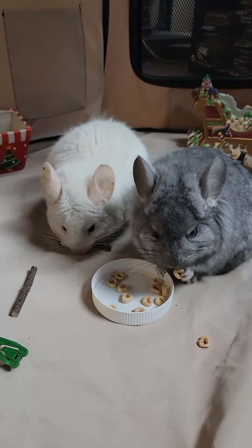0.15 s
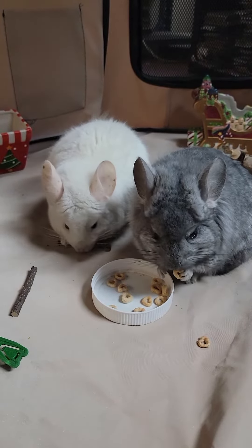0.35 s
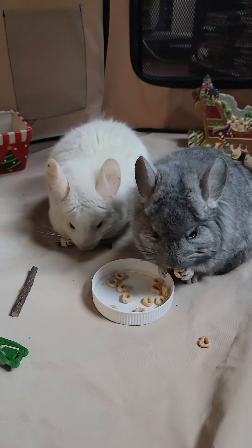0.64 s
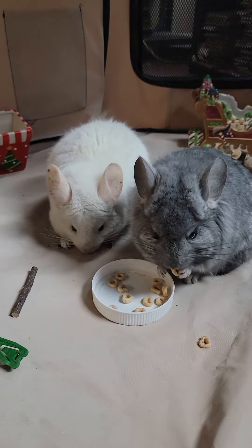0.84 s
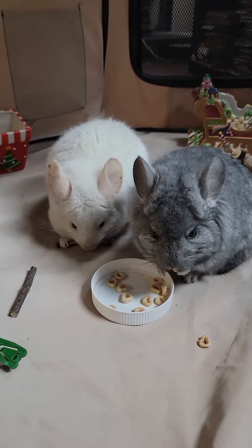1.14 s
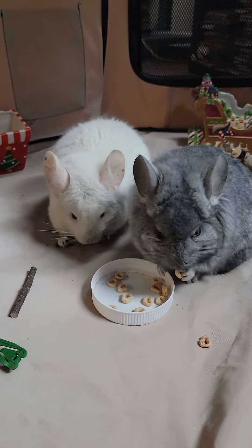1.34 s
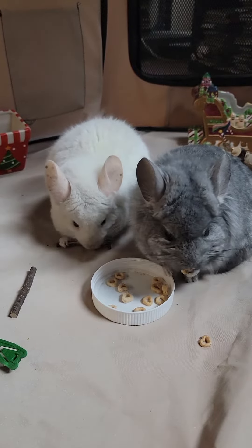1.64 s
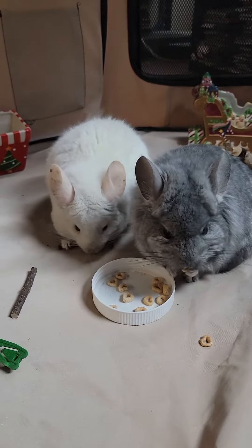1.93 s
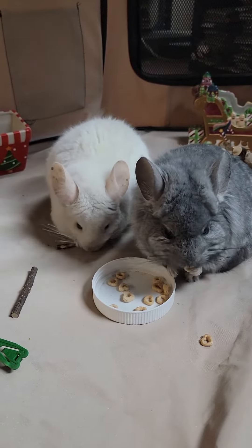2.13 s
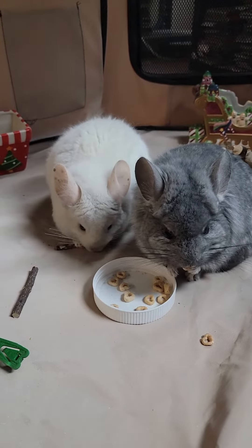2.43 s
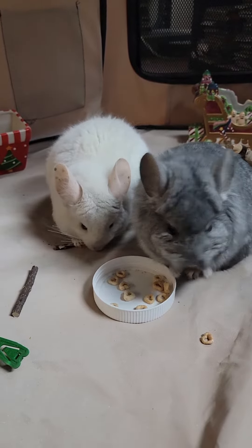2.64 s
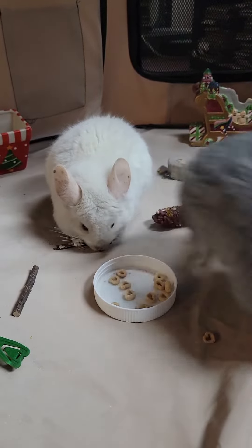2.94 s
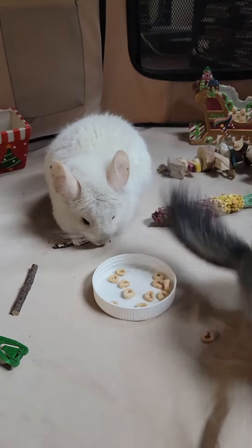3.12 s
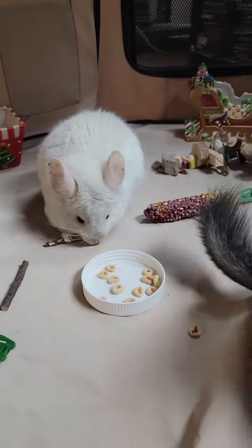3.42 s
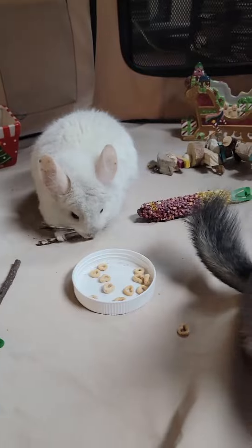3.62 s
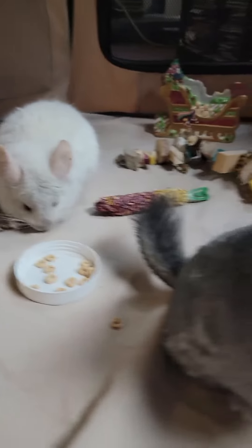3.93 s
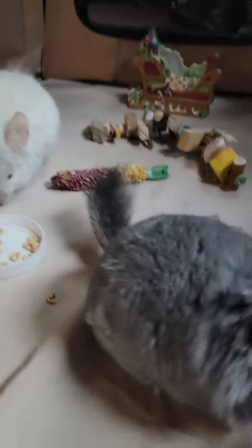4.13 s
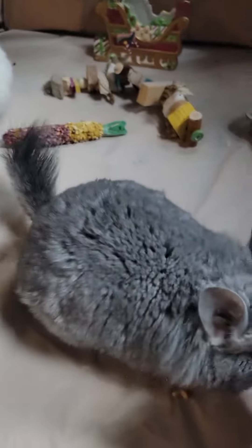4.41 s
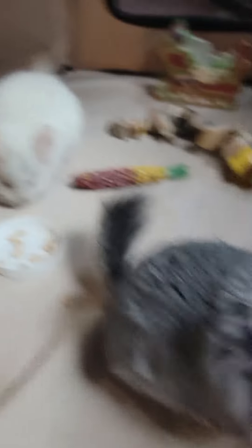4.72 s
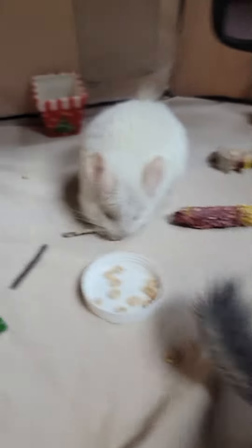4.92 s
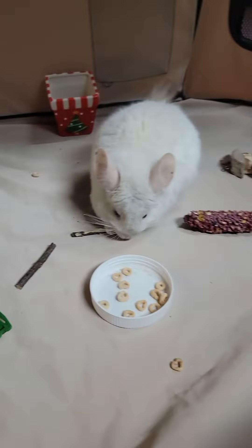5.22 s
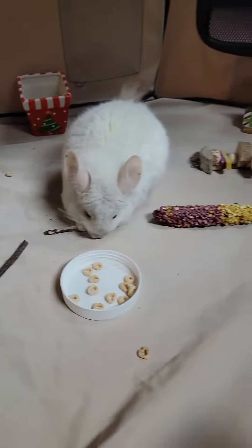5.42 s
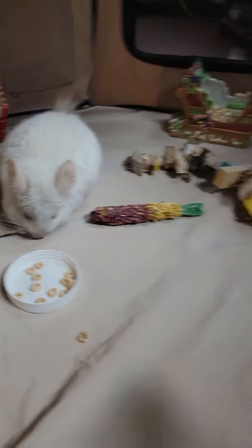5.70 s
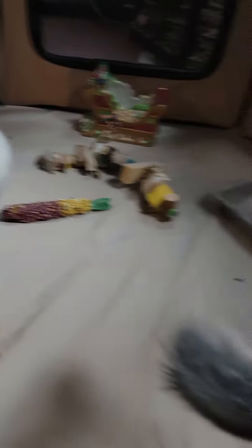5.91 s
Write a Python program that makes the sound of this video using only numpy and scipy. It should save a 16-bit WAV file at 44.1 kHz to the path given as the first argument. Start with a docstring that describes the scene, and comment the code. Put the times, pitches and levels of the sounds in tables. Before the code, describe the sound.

Two chinchillas crunch dry cereal and a twig close up, with sharp brittle cracks, tiny gritty grinding and soft fur rustling on cloth.

```python
"""In a soft pen on a cloth floor, two chinchillas nibble dry cereal and a twig close to a phone.
Sudden fracture of the food excites resonances of morsel, jaw, skull and teeth; grinding excites them
with dense random ticks. One animal hops about: its fur sweeps the cloth as flickering hiss and its
paws bump the floor as brief decaying tones. In the quiet room an appliance hums low, as a wavering
sine under two narrow noise bands, with faint air and microphone hiss."""
import sys
import numpy as np
from scipy import signal
from scipy.fft import irfft
from scipy.io import wavfile
from scipy.ndimage import uniform_filter1d

SR = 44100
rng = np.random.default_rng(int(sys.argv[2]) if len(sys.argv) > 2 else 0)


def waveform_to_disk(signal):
    """Save audio, clipped to [-1, 1], as 16-bit WAV at the path in sys.argv[1]."""
    frames = np.transpose(np.atleast_2d(signal))
    scaled = np.clip(frames, -1, 1) * 32767
    samples = np.round(scaled).astype(np.int16)
    wavfile.write(sys.argv[1], SR, samples)


N = 267246

# Cracks of the teeth: [t/s, morsel energy level/dB, morsel f/Hz, teeth level above morsel/dB]
CRACKS = [(.0017, -18, 4760, -8.5), (.0098, -13.5, 1800, -4.5), (0.1412, -36.5, 1590, 10),
          (.1471, -5.5, 1820, 1.5), (0.1596, -10.5, 2500, 1), (0.1854, -28.5, 2130, 2.5),
          (.4423, -37, 1680, 3.5), (.456, -32, 1890, -10), (.51, -22, 2030, -4), (0.538, -27.5, 1620, 2),
          (0.544, -25.5, 2460, 6), (.554, -26, 1860, 1), (0.5684, -9, 1850, 2), (.579, -12.5, 1900, -2.5),
          (0.5925, -13, 2370, 0.5), (0.7762, -33, 2190, 0.5), (.802, -22.5, 1710, -3),
          (.928, -21.5, 1950, -2.5), (0.9384, -26, 1670, -2.5), (1.0152, -28, 1640, -19),
          (1.0287, -31.5, 1530, 7.5), (1.036, -16, 1310, -4), (1.0643, -6, 2400, -2),
          (1.0694, -9, 2020, -8), (1.146, -41.5, 1600, 6), (1.4244, -3, 2470, -19), (1.764, -45, 900, 13.5),
          (1.7936, -32, 850, 7.5), (1.8304, -25, 3230, 6.5), (1.937, -32, 1550, 1),
          (2.095, -25.5, 1770, 2.5), (2.0979, -12, 2020, -10), (2.1092, -10, 2130, -4.5),
          (2.2126, -36.5, 1410, 2.5), (2.2826, -36.5, 1450, 3), (2.412, -13, 1700, -4),
          (2.4254, -12.5, 2090, -0.5), (2.556, -30.5, 2420, 1.5), (2.5705, -27.5, 1610, -10),
          (2.582, -31, 1970, -12), (2.5973, -11, 1610, 0.5), (2.6621, -53, 3530, 15.5),
          (2.769, -30.5, 1590, -10), (2.788, -28, 1750, -8.5), (2.8312, -12, 1600, 6.5),
          (2.924, -19.5, 1170, -16), (2.9941, -18.5, 2770, -14), (2.9986, -23.5, 1800, -10),
          (3.0064, -16, 1740, -10), (3.067, -56, 3500, 10.5), (3.1215, -20.5, 1280, -37),
          (3.3942, -15, 3900, -8), (3.4004, -14, 1680, -7.5), (3.4646, -8.5, 1580, 3.5),
          (3.549, -39.5, 3850, 14.5), (3.7696, -1, 1210, -15.5), (3.7917, -20, 1570, -7.5),
          (3.8157, -29, 1360, -5), (3.8477, -25.5, 1350, -12), (4.0486, -29.5, 1000, -17),
          (4.1003, -18, 4260, -5), (4.1086, -24, 1860, -21), (4.2147, -18, 2140, 1),
          (4.2422, -15, 1580, -1.5), (4.248, -18, 1620, -4.5), (4.2709, -25.5, 1700, -12),
          (4.4, -33, 1660, 3), (4.425, -24, 2170, -2), (4.4526, -15.5, 2080, -6), (4.46, -13.5, 2200, -6.5),
          (4.635, -20, 4470, -4), (4.709, -34, 910, -24), (4.7831, -10.5, 1420, -3), (4.798, -14, 4100, -5),
          (4.8059, -16.5, 3120, -10), (4.938, -16, 4670, -4), (4.9424, -13.5, 4170, -26),
          (5.655, -29.5, 3320, -11), (5.8307, -16.5, 3780, -4), (5.8416, -20, 3600, 3),
          (5.8535, -17.5, 3380, -16)]
# Resonances of crumbs, teeth and snap, in that order: [f/Hz, width/Hz]
CRUMB_TEETH_SNAP = [(3300, 1420), (6000, 2910), (13500, 12800)]
# Skull resonances, the dull knock under a crack: [f/Hz, width/Hz, relative level/dB]
SKULL_MODES = [(637, 181, 7.5), (330, 247, -4.5)]
# Broad jaw resonance under the morsel, one row: [f/Hz, width/Hz, level at zero brightness/dB]
JAW = (2076, 2450, -4.2)
# Grinding and scraping strokes: [t of the middle/s, length/s, jaw level/dB, teeth level above jaw/dB]
GRINDS = [(0.137, 0.027, -58.5, -2), (0.309, 0.0052, -78, 8), (0.354, 0.012, -63, -5),
          (.542, 0.065, -64.5, 6), (0.586, 0.047, -52, -1.5), (0.803, 0.031, -68, 11),
          (0.92, 0.039, -56, -9), (1.051, 0.056, -55.5, -0.5), (1.865, .02, -68.5, 4),
          (1.908, 0.024, -55.5, -4.5), (1.95, 0.041, -55.5, 0), (2.006, .017, -61.5, -2.5),
          (2.091, 0.024, -69, 3), (2.199, 0.043, -75, 7), (2.279, 0.026, -49.5, -7.5),
          (2.394, 0.024, -56.5, 1), (2.589, 0.061, -58, -2), (2.887, 0.0092, -56, -12),
          (2.927, 0.055, -55.5, -5.5), (2.995, 0.016, -51, 5.5), (3.134, 0.029, -57.5, -1),
          (3.375, .015, -51.5, -7), (4.094, 0.038, -55.5, 0), (4.147, 0.025, -52.5, -3.5),
          (4.262, 0.05, -63, 6), (4.323, 0.023, -59, -28), (4.638, 0.028, -60.5, 11),
          (4.714, 0.024, -61, -7), (4.789, 0.08, -57, 6.5), (5.371, 0.063, -66.5, 2),
          (5.669, 0.055, -62, 2.5), (5.776, 0.021, -68, 3), (5.848, 0.034, -54.5, 7)]
# Fur sweeping the cloth, before flicker and stereo balance: [t/s, level/dB]
SWEEP = [(0, -78), (1.2, -71.5), (1.55, -70), (1.72, -78.5), (1.95, -74.5), (3.08, -69), (3.24, -64),
         (3.45, -56.5), (3.6, -60.5), (3.9, -59), (4.55, -70), (4.7, -63.5), (4.95, -57.5), (5.15, -62.5),
         (5.25, -73.5), (5.42, -64.5), (5.57, -55.5), (5.75, -69), (6.06, -74.5)]
# Spectrum of the fur hiss: [f/Hz, relative level per Hz/dB]
FUR_SPECTRUM = [(180, -38), (300, -7), (513, -21), (586, -1.5), (968, -15), (1070, -8.5), (1800, -2),
                (6530, -4.5), (9600, -17.5), (15100, -13), (16400, -38)]
# Soft paw bumps through the floor: [t/s, f/Hz, peak level/dB]
BUMPS = [(.09, 318, -66), (.385, 108.4, -66), (.7, 312, -61), (2.891, 261, -60)]
# Spectrum of the air and microphone hiss: [f/Hz, relative level per Hz/dB]
QUIET_SPECTRUM = [(12, -94), (20, -36), (76, -12.5), (130, -31.5), (153, -30), (431, -37.5), (496, -22.5),
                  (637, -30.5), (1470, -29), (2240, -38), (7000, -47), (10000, -54.5), (14500, -42.5),
                  (16300, -60)]
# Left-right correlation of the hisses, negative in antiphase: [f/Hz, correlation]
CORRELATION = [(60, 0.29), (130, 0.725), (290, -0.32), (640, -0.53), (1400, -0.25), (15000, 0.0045)]
# Fuzzy hum bands above the tone, before stereo balance: [f/Hz, width/Hz, level/dB]
HUM_BANDS = [(123.2, 4.1, -82), (318.7, 108, -80.5)]
# Hum tone as the phone turns in the room, before swell and stereo balance: [t/s, level/dB]
HUM_LEVEL = [(0, -71.5), (3.6, -71.5), (4.35, -77), (4.9, -75), (6.06, -75)]
# Reverberation time of the pen: [f/Hz, t60/s]
PEN_T60 = [(300, 0.068), (1500, 0.083), (5000, 0.066), (14000, 0.092)]
# Near sounds, port level difference: [f/Hz, left level above right/dB]
LEFT_ABOVE_RIGHT = [(60, -17), (300, -5), (2400, -3), (5000, -7), (8000, -2.5), (14000, 8)]
# Near sounds, port phase difference: [f/Hz, half-applied left phase lead/rad]
LEFT_LEAD = [(60, 0.94), (300, 1.5), (1000, 1.91), (2200, 0.72), (5000, 1.75), (8000, 1.93), (14000, 0)]

MORSEL_WIDTH = 0.8  # resonance width as a share of its frequency
SPREAD_DB = 6  # standard deviation of splinter level: sizes are very uneven
# Skull knock: base level/dB, growth per dB of morsel, change per dB of brightness, far change/dB
SKULL_DB, SKULL_GROWTH, SKULL_PER_BRIGHT, FAR_SKULL_DB = -18.5, 0.75, -0.25, -6.5
HOP_AWAY_S = 3.6  # one animal has moved off after this time
# Snap: level above morsel/dB, rise per dB of brightness, rise per octave of morsel pitch/dB
SNAP_DB, SNAP_FOLLOWS, SNAP_PER_OCTAVE_DB = -7, 1, 4
QUIET_DB, HUM_HZ = -69.5, 73.5  # rms level of the hiss before stereo balance; mean hum pitch
EDGE_HZ = 16900  # upper band limit


def amp(db):
    """Decibel law: amplitude gain of a level in dB."""
    return 10 ** (np.asarray(db) / 20)


def evened(x):
    """Power normalisation: scales a signal to rms 1."""
    return x / np.sqrt(np.mean(x ** 2) + 1e-20)


def read(points, hz):
    """Logarithmic pitch scale: interpolates a table over log frequency."""
    f, value = np.transpose(points)
    return np.interp(np.log(hz + 1), np.log(f + 1), value)


def curve(rows):
    """Linear interpolation: joins (t, value) rows into one value a sample."""
    return np.interp(np.arange(N) / SR, *np.transpose(rows))


def ring(x, hz, width):
    """Resonance: a band-pass filter along the last axis."""
    edges = np.clip([hz - width / 2, hz + width / 2], .5, SR / 2 - 100)
    return signal.sosfilt(signal.butter(3, edges, "band", fs=SR, output="sos"), x)


def pair(shared, apart, alike):
    """Partial coherence: the left port hears partly another path than the right."""
    alike = np.clip(alike, 0, 1)
    left = alike * shared + np.sqrt(1 - alike ** 2) * apart
    return np.array([left, shared])


def hiss(colour, patchy_db):
    """Spectral shaping: partly correlated stereo noise with drifting patches, rms 1."""
    frames, hz = N // 256 + 5, np.fft.rfftfreq(1024, 1 / SR)
    a, b, c, d, patches = rng.standard_normal((frames, 513, 5)).T
    # smooth over frequency, then over time
    patches = uniform_filter1d(patches, size=14, axis=0)
    patches = evened(uniform_filter1d(patches, size=10, axis=1))
    same = np.clip(read(CORRELATION, hz), -1, 1)[:, None]
    left = a + 1j * b
    right = same * left + np.sqrt(1 - same ** 2) * (c + 1j * d)
    patch_depth = patchy_db * np.clip(hz / 400, 0, 1)[:, None]  # steadier below 400 Hz
    spectrum = np.array([left, right]) * amp(read(colour, hz)[:, None] + patch_depth * patches)
    return evened(signal.istft(spectrum, nperseg=1024, noverlap=768)[1][:, :N])


def cracks():
    """Brittle fracture: soft onset, one sharp break and crumbling excite morsel, jaw, skull and teeth."""
    lead, length = 300, 1200  # samples of soft onset before the break; samples in all
    out = np.zeros((2, N + length))
    t = np.arange(-lead, length - lead) / SR
    chance = rng.standard_normal((len(CRACKS), 3, len(t)))
    onset = 0.09 * np.clip(1 + t * SR / lead, 0, 1) ** 2
    crumble = 0.44 * np.exp(-t / 0.00056) + 0.12 * np.exp(-t / 0.0037)
    envelope = np.where(t < 0, onset, crumble)
    teeth_mode, snap_mode = CRUMB_TEETH_SNAP[1], CRUMB_TEETH_SNAP[2]
    for (s, morsel_db, morsel_hz, bright_db), (shared, apart, size) in zip(CRACKS, chance):
        splinters = envelope * amp(SPREAD_DB * size) * pair(shared, apart, alike=1.0)
        drive = splinters + (t == 0) * np.sign(size[0]) * 3  # the break, of random sign
        skull = sum(amp(db) * ring(drive, hz, width) for hz, width, db in SKULL_MODES)
        # brighter cracks shake the jaw as well as the teeth
        jaw = amp(JAW[2] + 0.23 * bright_db) * ring(drive, *JAW[:2])
        morsel = ring(drive, morsel_hz, MORSEL_WIDTH * morsel_hz) + jaw
        teeth = ring(drive, *teeth_mode)
        snap = ring(splinters + 0.14 * drive, *snap_mode)
        skull_db = SKULL_DB + SKULL_GROWTH * morsel_db + SKULL_PER_BRIGHT * bright_db
        skull_db += FAR_SKULL_DB * (s > HOP_AWAY_S)
        octaves = np.log2(morsel_hz / JAW[0])
        snap_db = morsel_db + SNAP_DB + SNAP_FOLLOWS * bright_db + SNAP_PER_OCTAVE_DB * octaves
        at = round(s * SR)
        levels = [morsel_db, skull_db, morsel_db + bright_db, snap_db]
        for part, db in zip([morsel, skull, teeth, snap], levels):
            unit_energy = part / np.linalg.norm(part, axis=1)[:, None]
            out[:, at:at + length] += amp(db) * unit_energy
    return out[:, lead:N + lead]


def grinding():
    """Random impulse excitation: dense uneven ticks in each stroke ring jaw, crumbs, teeth and snap."""
    t, jaw, teeth = np.arange(N) / SR, np.zeros(N), np.zeros(N)
    for s, length, db, teeth_db in GRINDS:
        stroke = amp(db) * np.exp(-(2 * (t - s) / length) ** 2)
        jaw += stroke
        teeth += stroke * amp(teeth_db)
    sizes = amp(4.5 * np.minimum(rng.exponential(1, N), 4))
    ticks = sizes * (rng.random(N) < 2500 / SR)  # 2500 ticks a second on average
    drive = pair(*(ticks * rng.standard_normal((2, N))), alike=0.74)
    low = evened(ring(drive, 1546, 1030))
    high = sum(amp(db) * evened(ring(drive, *mode)) for mode, db in zip(CRUMB_TEETH_SNAP, (-2.5, -3, -11)))
    return jaw * low + teeth * high


def fur():
    """Sliding friction: fur and paws on cloth hiss and flicker; claws and crumbs add stray ticks."""
    flicker_db = evened(uniform_filter1d(rng.standard_normal(N), size=220))
    sizes = amp(4 * np.minimum(rng.exponential(1, N), 3))
    stray = sizes * (rng.random(N) < 40 / SR)  # 40 ticks a second on average
    ticks = evened(ring(pair(*(stray * rng.standard_normal((2, N))), alike=0.62), 5300, 6000))
    rub = amp(curve(SWEEP) + flicker_db) * hiss(FUR_SPECTRUM, patchy_db=2.2)
    return amp([[-1.5], [1.5]]) * (rub + amp(-84.5) * ticks)  # balance tilted 3 dB to the right


def bumps():
    """Damped vibration: the floor under a paw sounds for a few soft cycles."""
    t, out = np.arange(N) / SR, np.zeros(N)
    for s, hz, db in BUMPS:
        age = np.maximum(t - s, 0) / 0.011  # envelope peaks 11 ms after the start
        out += amp(db) * age * np.exp(1 - age) * np.sin(2 * np.pi * hz * t)
    return out


def pen(x):
    """Reverberation: sparse echoes of random sign off the cloth walls, decaying by frequency."""
    taps = np.zeros((2, SR // 4))
    at = np.arange(120, SR // 4 - 20, 20)
    shape = (2, len(at))
    places = at + rng.integers(0, 20, shape)
    np.put_along_axis(taps, places, rng.choice([-1., 1.], shape), 1)
    hz, t, z = signal.stft(taps, SR, nperseg=128)
    decay = amp(-60 * t / read(PEN_T60, hz)[:, None])
    tail = signal.istft(z * decay, SR, nperseg=128)[1]
    return signal.fftconvolve(x, tail / np.linalg.norm(tail[0]), axes=1)[:, :N]


def ports(x):
    """Diffraction: the phone body sets level and phase between two ports; both dip 6 dB at 10.2 kHz."""
    hz = np.fft.rfftfreq(512, 1 / SR)
    # half of each difference goes to either port
    half = amp(read(LEFT_ABOVE_RIGHT, hz) / 2) * np.exp(.5j * read(LEFT_LEAD, hz))
    dip = amp(-6 * np.exp(-((hz - 10200) / 1300) ** 2))
    kernel = np.roll(irfft([half, 1 / half] * dip), 256, axis=1)
    return signal.oaconvolve(x, kernel, "same", axes=1)


def room_tone():
    """Modulated sine in noise: a wavering motor tone, two fuzzy bands, faint air and microphone hiss."""
    # pitch waver in Hz and level swell in dB, both of rms 1
    waver, swell = (evened(ring(v, 4.27, 6.87)) for v in rng.standard_normal((2, N)))
    phase = 2 * np.pi * np.cumsum(HUM_HZ + waver) / SR
    tone = np.sqrt(2) * amp(curve(HUM_LEVEL) + swell) * np.sin(phase)
    drive = pair(*rng.standard_normal((2, N)), alike=0.4)
    upper = sum(amp(db) * evened(ring(drive, hz, width)) for hz, width, db in HUM_BANDS)
    air = amp(QUIET_DB) * hiss(QUIET_SPECTRUM, patchy_db=3.5)
    return amp([[-1.6], [1.6]]) * (air + tone + upper)  # balance tilted 3.2 dB to the right


def scene():
    """Superposition: near mouth sounds with their echo, over fur, paws and room tone."""
    mouth = cracks() + grinding()
    return ports(mouth + amp(-10) * pen(mouth)) + fur() + bumps() + room_tone()


def record(dry):
    """Band limitation: a low-pass at the upper edge of the sound."""
    lowpass = signal.firwin(511, EDGE_HZ, window=("kaiser", 9), fs=SR)
    return signal.oaconvolve(dry, lowpass[None], "same")


dry = scene()
out = record(dry)
waveform_to_disk(out)
```